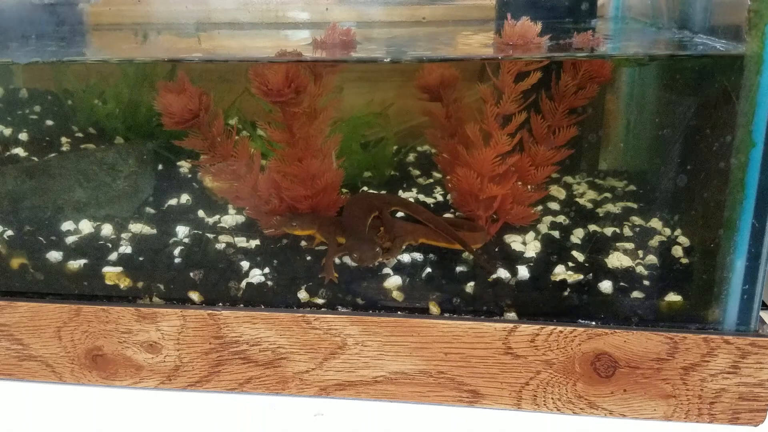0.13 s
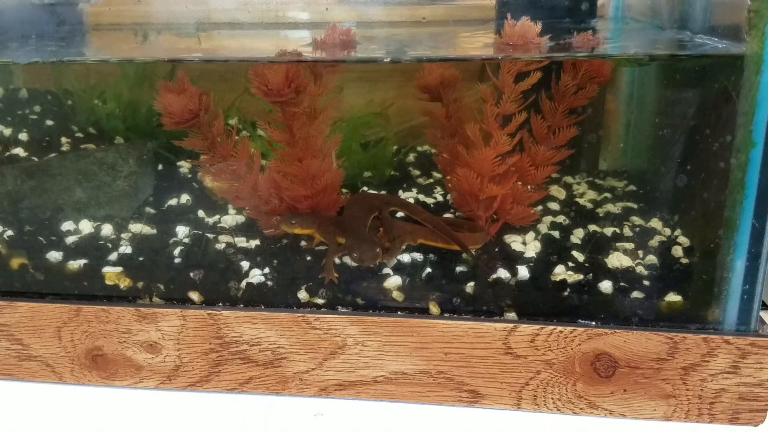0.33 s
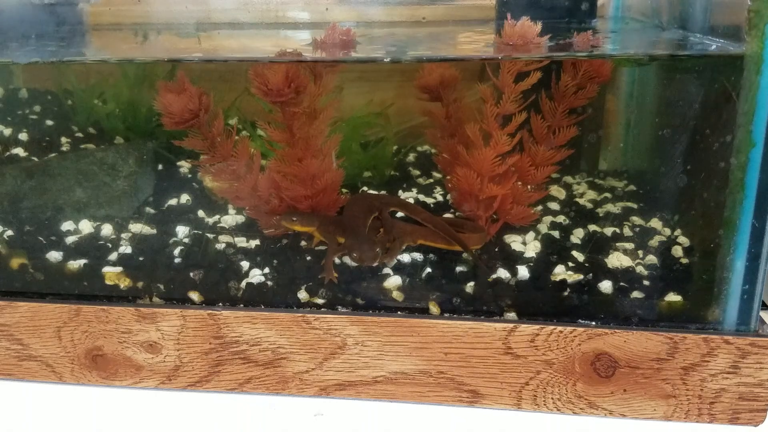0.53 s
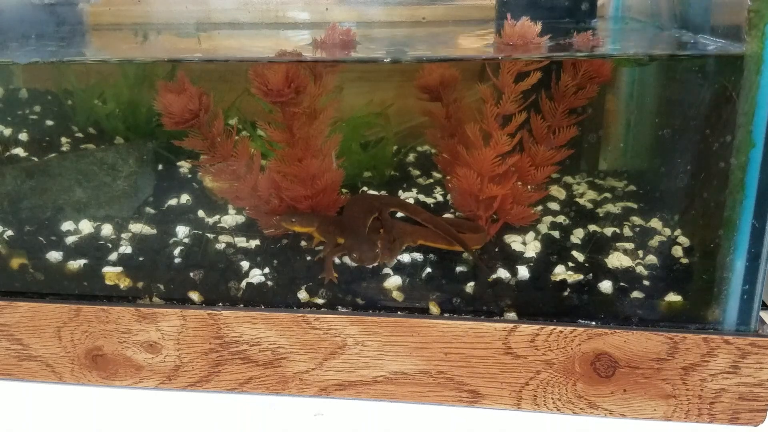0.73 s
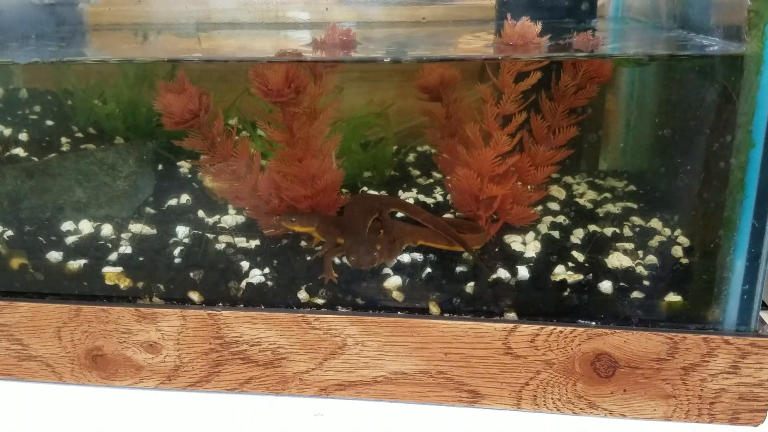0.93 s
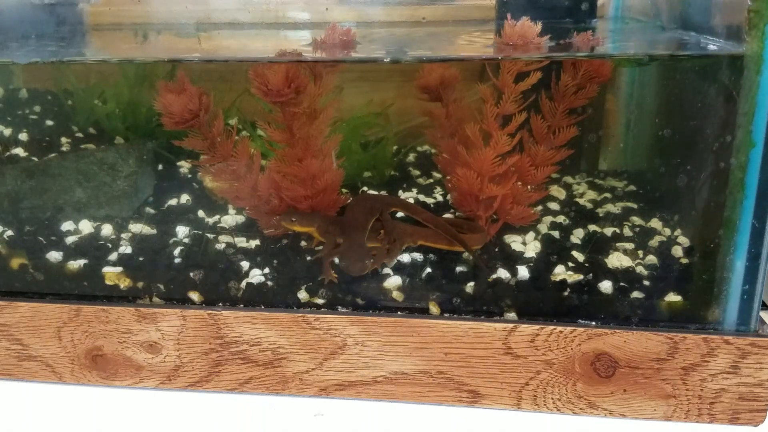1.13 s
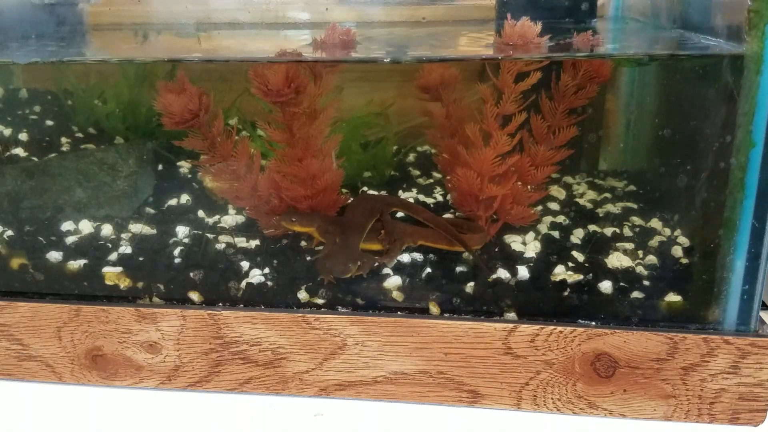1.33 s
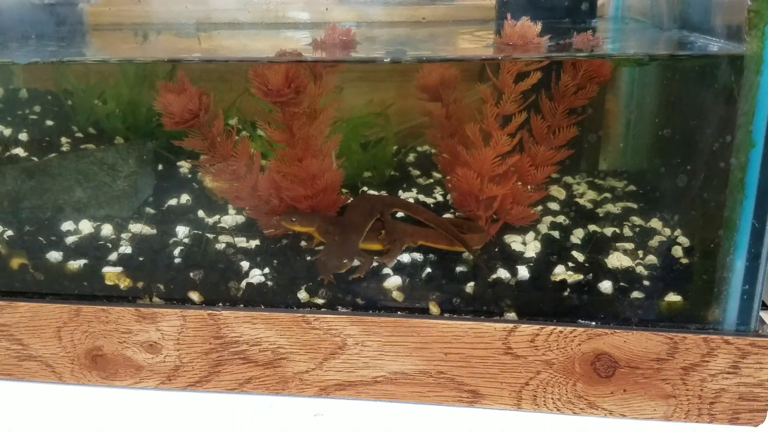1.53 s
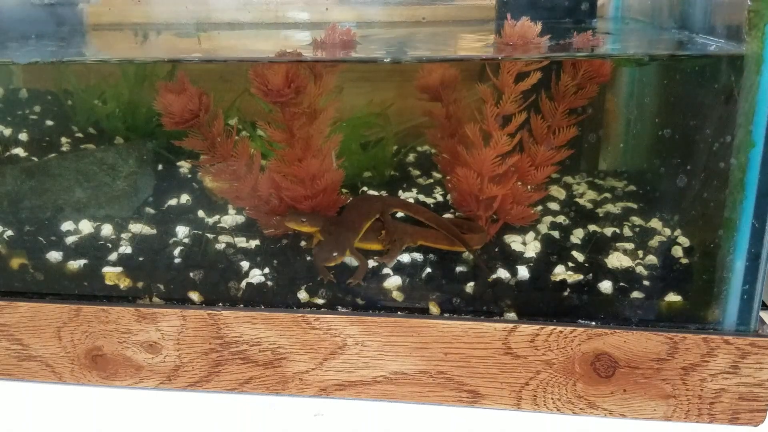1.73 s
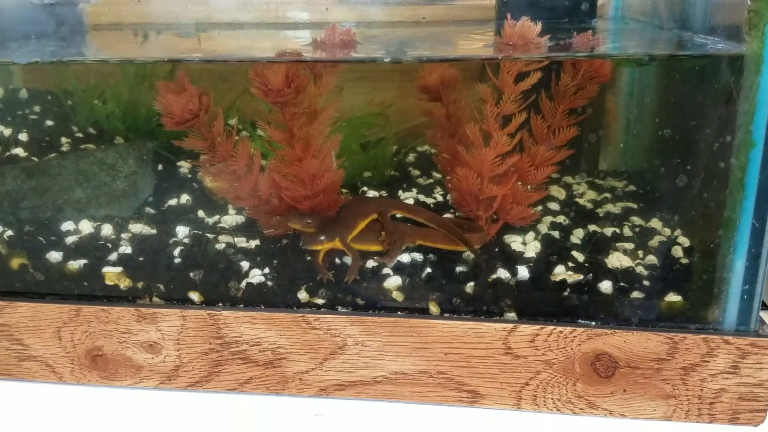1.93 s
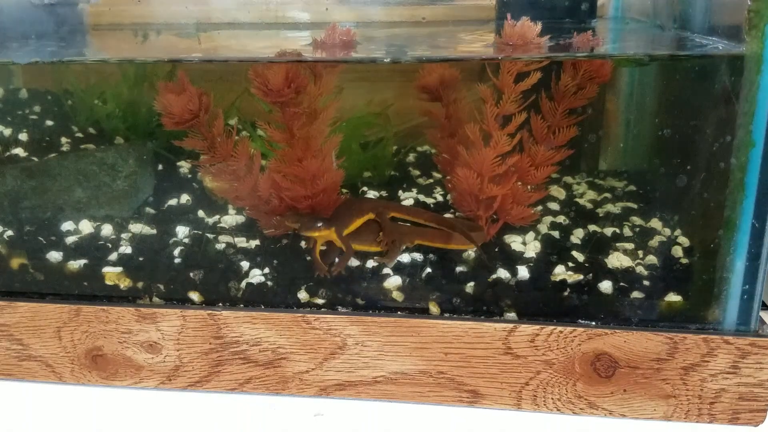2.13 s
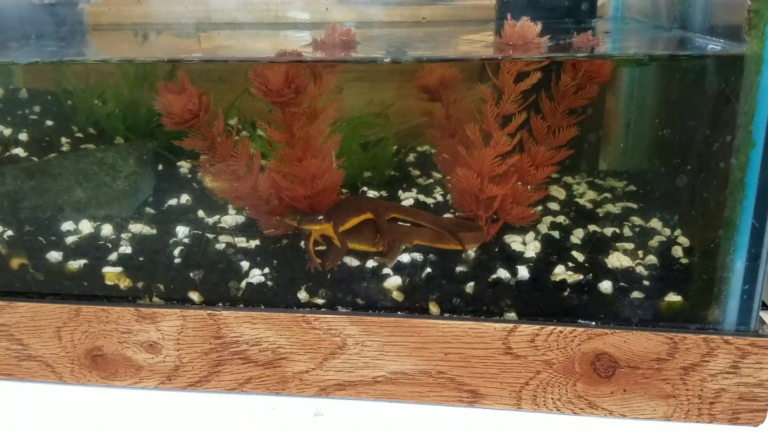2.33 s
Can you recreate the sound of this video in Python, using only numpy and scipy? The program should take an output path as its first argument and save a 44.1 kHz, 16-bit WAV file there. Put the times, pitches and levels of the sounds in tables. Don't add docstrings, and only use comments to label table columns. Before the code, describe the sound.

Fish tank equipment hums low and constant under a smooth airy hiss, fading in from silence

```python
import sys
import numpy as np
from scipy import signal
from scipy.fft import rfft, irfft
from scipy.io import wavfile
from scipy.ndimage import uniform_filter1d

SR = 44100
rng = np.random.default_rng(int(sys.argv[2]) if len(sys.argv) > 2 else 0)


def output_pcm(signal):
    pcm = np.clip(np.atleast_2d(signal).T, -1, 1) * 32767
    wavfile.write(sys.argv[1], SR, np.round(pcm).astype(np.int16))


def volts(x):
    e = np.asarray(x, float) / 20
    return 10 ** e


N = 109323
TIME_S = np.arange(N) / SR
FREQ_HZ = np.arange(1, N // 2 + 2) * SR / N
LEFT_RIGHT = np.array([[.5], [-.5]])


def level(x, db):
    return x * volts(db) / np.sqrt(np.mean(x ** 2))


def walk(rate_hz):
    hold = int(SR / rate_hz)
    steps = np.repeat(rng.standard_normal(N // hold + 1), hold)
    smooth = uniform_filter1d(uniform_filter1d(steps, hold), hold)
    return 1.28 * smooth[:N]


def bell(f, centre_hz, width_hz):
    return 1 / np.sqrt(1 + ((f - centre_hz ** 2 / f) / width_hz) ** 2)


def tone(pitch_hz, left_leads_s=0., pan_db=0.):
    phase = 2 * np.pi * np.cumsum(pitch_hz) / SR + rng.uniform(0, 2 * np.pi)
    lead = 2 * np.pi * pitch_hz * left_leads_s * LEFT_RIGHT
    return np.sqrt(2) * np.sin(phase + lead) * volts(pan_db * LEFT_RIGHT)


def microphone_hiss():
    noise = rfft(rng.standard_normal((2, N)))
    hiss = level(irfft(noise * bell(FREQ_HZ, 14400, 7400), N), -57.5)
    pan_db = 2.6
    return hiss * volts(.5 * walk(7.1) + pan_db * LEFT_RIGHT)


# start_s (middle of the burst), level_db, pitch_hz
BUBBLES = [
    (2.035, -64, 8600),
    (2.2, -67, 8200),
    (2.26, -72, 14500),
    (0.93, -75, 9000),
]


def bubbles():
    burst_s = 0.019
    noise = rfft(rng.standard_normal((2, N)))
    out = 0
    for start_s, level_db, pitch_hz in BUBBLES:
        puff = irfft(noise * bell(FREQ_HZ, pitch_hz, pitch_hz / 4) ** 2, N)
        out = out + level(puff, level_db) * np.exp(-((TIME_S - start_s) / burst_s) ** 2)
    return out


def room():
    decay_s, share = .02, .24
    tail = rng.standard_normal((2, N)) * np.exp(-TIME_S / decay_s)
    tail = tail / np.sqrt(np.sum(tail ** 2, axis=1, keepdims=True))
    return 1 + share * rfft(tail)


# pitch_hz, level_db (per Hz)
RUSH_COLOUR = [(82, -11.5), (140, -5.5), (253, -2.5), (307, -10), (365, -7.5), (535, -12), (1240, -19.5),
               (1750, -23.5), (9000, -46), (11700, -84), (19800, -120)]
# pitch_hz, width_hz, lift_db
BODY = [
    (92, 20, 3.5),
    (189, 17.3, 3.5),
    (260.6, 42, 3.5),
    (339, 20.3, 6.5),
    (800, 120, 4.5),
    (2050, 220, 1.5),
    (4490, 280, 2.5),
    (8080, 1400, 5.5),
    (9400, 900, -8.5),
    (2500, 160, 0.5),
]


def rush():
    bass_cut_hz, bass_slope = 62, 2.2
    travel_s = 0.00043
    right_dull_db = 0.36

    around = np.cos(np.linspace(0, np.pi, num=24))[:, None]
    alike = (1 - .004) * np.mean(np.cos(2 * np.pi * FREQ_HZ * travel_s * around), axis=0)

    pitch_hz, level_db = np.array(RUSH_COLOUR).T
    colour_db = np.interp(np.log(FREQ_HZ), np.log(pitch_hz), level_db)
    for centre_hz, width_hz, lift_db in BODY:
        colour_db = colour_db + lift_db * bell(FREQ_HZ, centre_hz, width_hz) ** 2
    bass_cut = 1 / np.sqrt(1 + (bass_cut_hz / FREQ_HZ) ** (2 * bass_slope))
    gain = volts(colour_db) * bass_cut * bell(FREQ_HZ, 100, 12500) ** 2

    shares = np.sqrt(np.clip([1 + alike, 1 - alike], 0, 2))
    mid, side = rfft(rng.standard_normal((2, N))) * gain * shares
    tilt = volts(right_dull_db * np.log2(1 + FREQ_HZ / 300) / 2)
    pair = np.array([(mid + side) * tilt, (mid - side) / tilt]) * room()

    swell_db = .25 * walk(0.94)
    octaves = np.clip(np.log2(FREQ_HZ), 5, 14)
    out = 0
    for octave in np.arange(5, 15):
        band = np.clip(1 - np.abs(octaves - octave), 0, 1)
        out = out + irfft(pair * band, N) * volts(swell_db + 0.66 * walk(8.86))
    return level(out, -31.5)


# start_s, level_db
THRUM = [(0.45, -55), (0.5, -48), (1.12, -48), (1.17, -63), (1.44, -47), (1.48, -58), (1.69, -47),
         (1.87, -50), (1.93, -63), (2.02, -44), (2.27, -48.5), (2.47, -59)]


def shaft_thrum():
    start_s, level_db = np.array(THRUM).T
    loudness_db = np.interp(TIME_S, start_s, level_db) + 1.5 + 2 * walk(6)
    shaft_hz = 57.4 * (1 + 0.0318 * walk(8.4))
    return volts(loudness_db) * tone(shaft_hz)


# pitch_hz, level_db, pan_db (above 0 is left), drift_hz, left_leads_ms
WHINES = [(374.3, -52, 1, 2, .3), (450.2, -54, -3, 2, .4), (977, -61, 1, 4, .72), (1296, -63, 4, .8, .37),
          (1354.6, -64, 8, .8, .3), (1413, -67, 0, .8, .1), (1473, -64, -5, .8, .46),
          (1599.5, -67, -9, .8, 0), (1691.7, -64, -1, 2, .08), (1747.6, -65, -7, .8, .42),
          (1804.1, -65, 2, .8, .41), (2040, -72, 0, 2, 0), (4059, -82, 3, 1.5, 0), (4115.5, -78, 4, 1.5, 0),
          (4172, -78, 10, 1.5, .04), (4228, -77, 6, 1.5, .12), (4469, -79, 0, 12, 0), (5524, -85, 0, 4, 0),
          (6794, -86, 0, 25, 0), (13787, -86, 3, 5, 0)]


def whines():
    out = 0
    for pitch_hz, level_db, pan_db, drift_hz, left_leads_ms in WHINES:
        loudness_db = level_db + 2.5 + 2.5 * walk(4.4)
        out = out + volts(loudness_db) * tone(pitch_hz + drift_hz * walk(5), left_leads_ms / 1e3, pan_db)
    return out


# pitch_mains (multiple of the mains rate), level_db
CORE = [
    (2, -34),
    (4, -57),
]


def core_hum():
    mains_hz = 59.9
    out = 0
    for multiple, level_db in CORE:
        out = out + volts(level_db + 1.18 * walk(14)) * tone(np.full(N, multiple * mains_hz))
    return out


def scene():
    background = microphone_hiss() + bubbles() + rush()
    motor = shaft_thrum() + whines() + core_hum()
    return background + motor


def hold_bass(x):
    opens_s = .41
    shelf_db = -3 / (1 + (FREQ_HZ / 250) ** 2)
    deep_db = -15 / (1 + (FREQ_HZ / 75.5) ** 6)
    thinned = irfft(rfft(x) * volts(shelf_db + deep_db), N)
    held = np.clip((opens_s - TIME_S) / .01, 0, 1)
    return x + held * (thinned - x)


def fade_in(x):
    start_s, fade_from_s, fade_s = .14, .113, .68
    rise = np.sin(np.pi / 2 * np.clip((TIME_S - fade_from_s) / fade_s, 0, 1))
    return x * rise * np.clip((TIME_S - start_s) / 0.0017, 0, 1)


def switch_pop():
    pop_s, decay_s = .1272, .002
    after = np.clip(TIME_S - pop_s, 0, 1) / decay_s
    return volts(-60) * (after > 0) * np.exp(-after) * np.cos(after)


def roll_off(x):
    return signal.sosfilt(signal.butter(12, 16130, fs=SR, output="sos"), x)


def record(dry):
    x = fade_in(hold_bass(dry)) + switch_pop()
    top_cut = signal.ellip(12, .3, 60, 15740, fs=SR, output="sos")
    return roll_off(signal.sosfilt(top_cut, x))


dry = scene()
out = record(dry)
output_pcm(out)
```